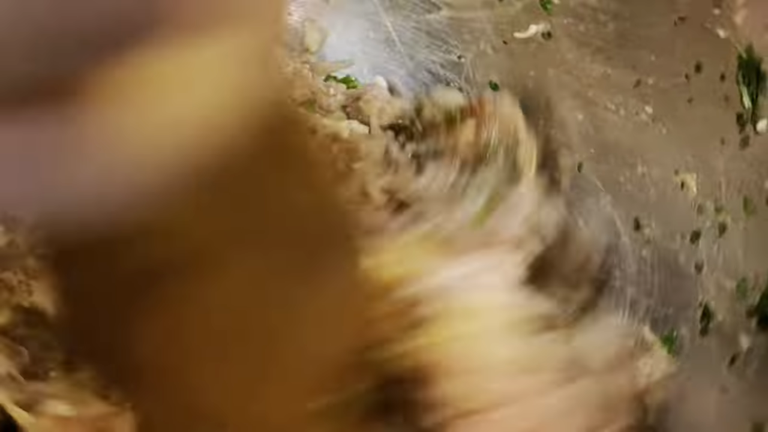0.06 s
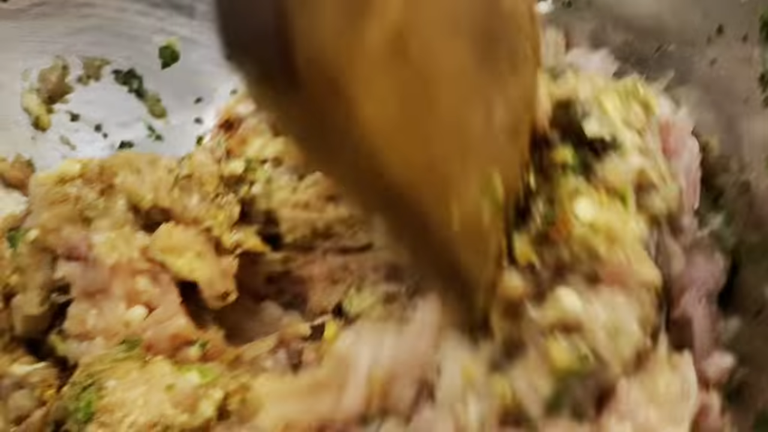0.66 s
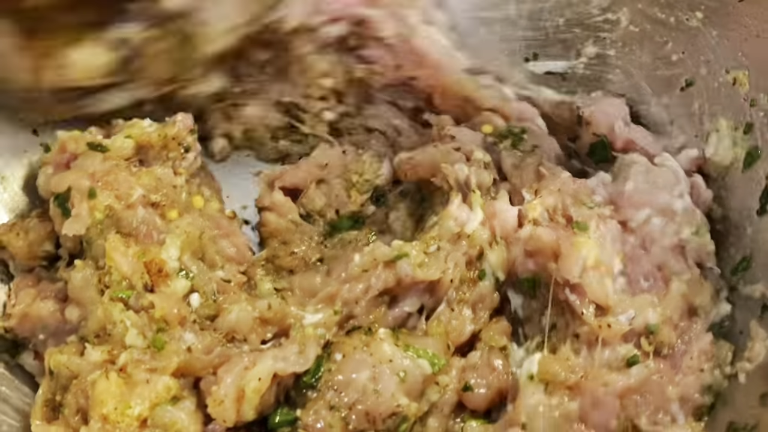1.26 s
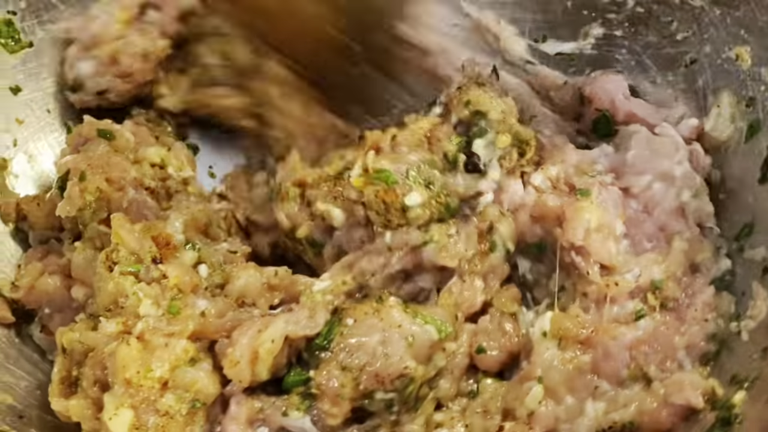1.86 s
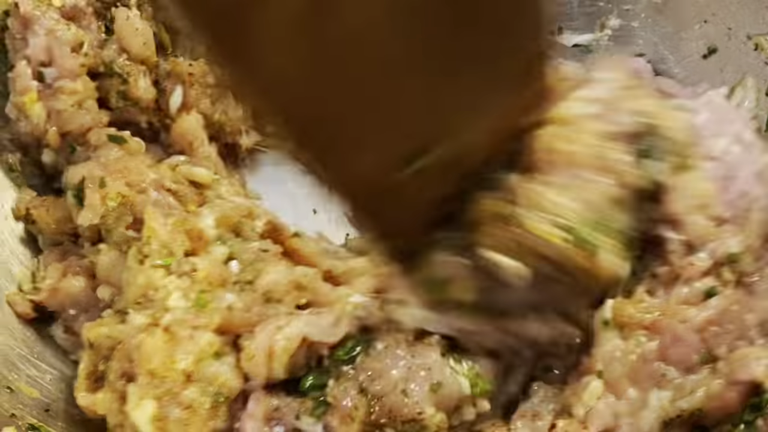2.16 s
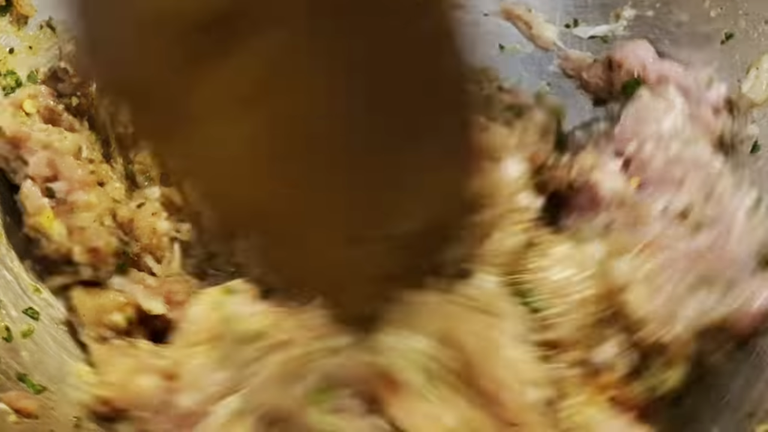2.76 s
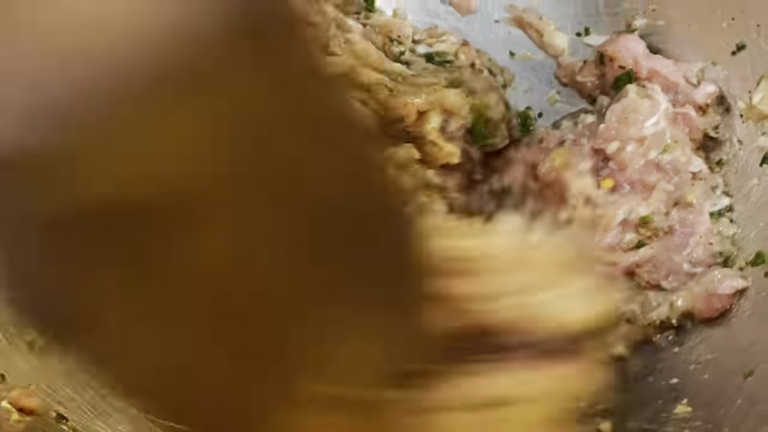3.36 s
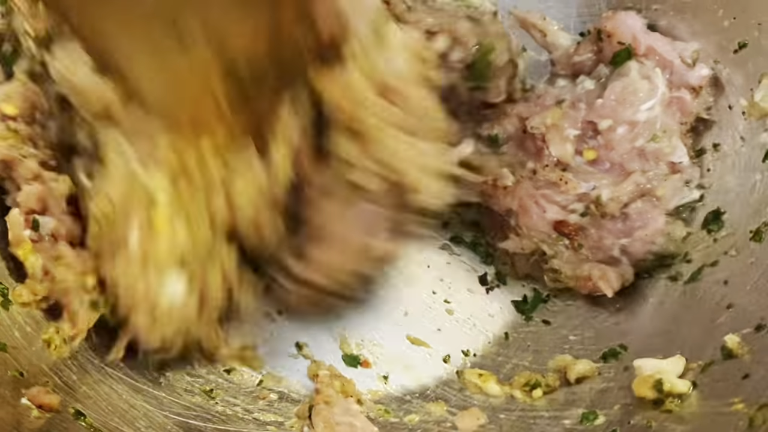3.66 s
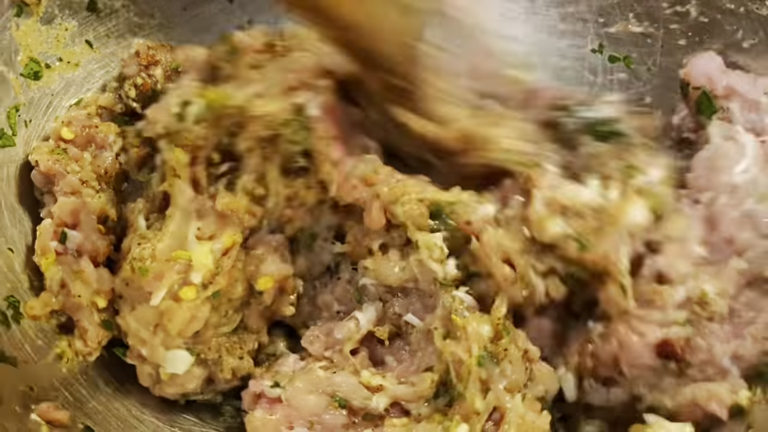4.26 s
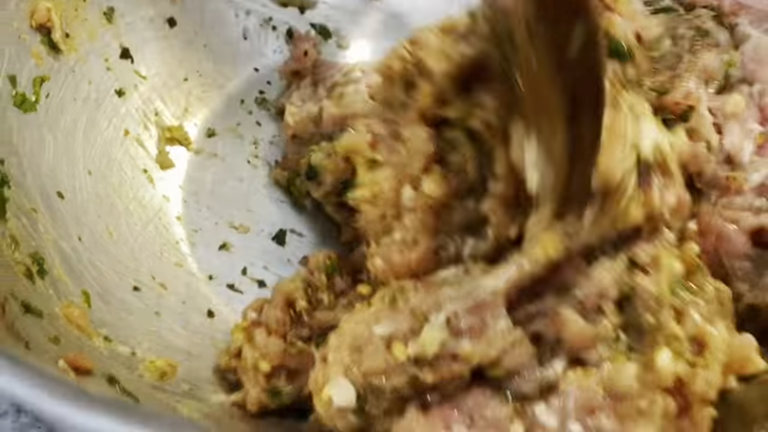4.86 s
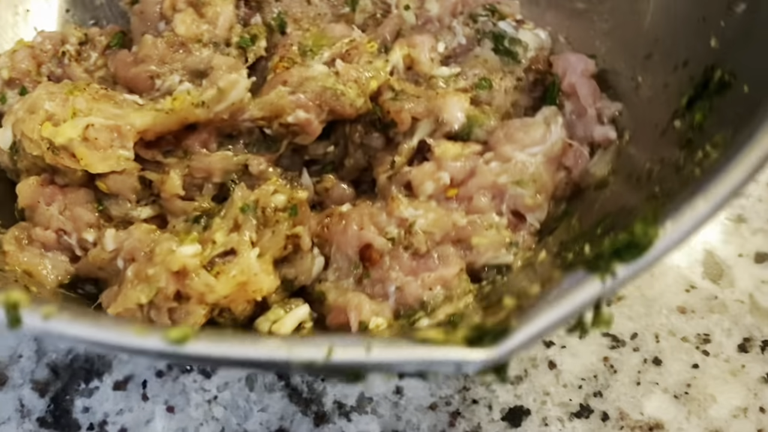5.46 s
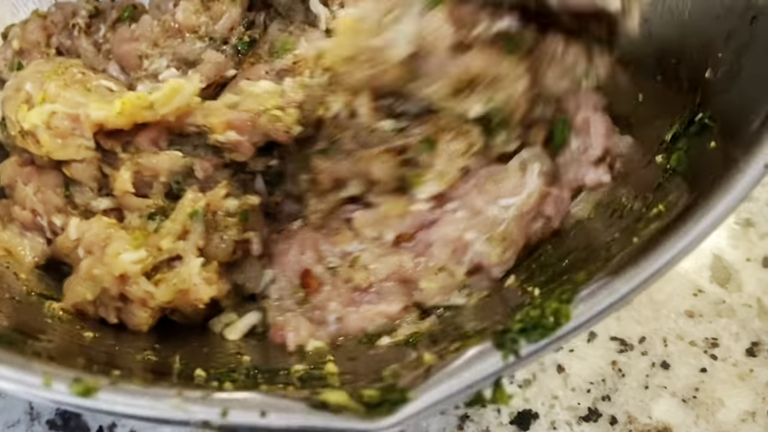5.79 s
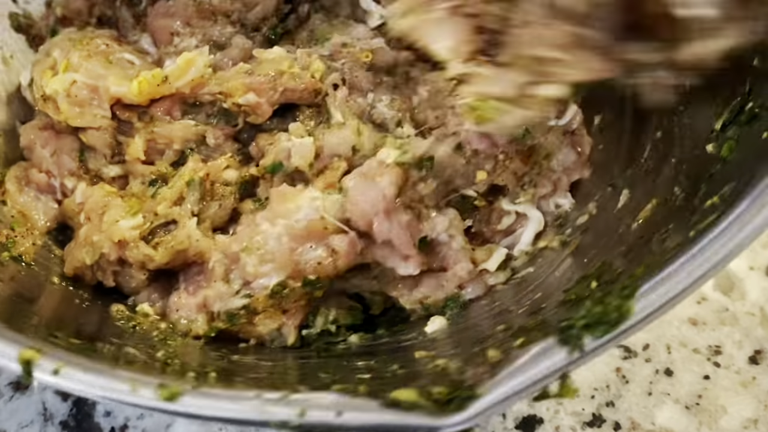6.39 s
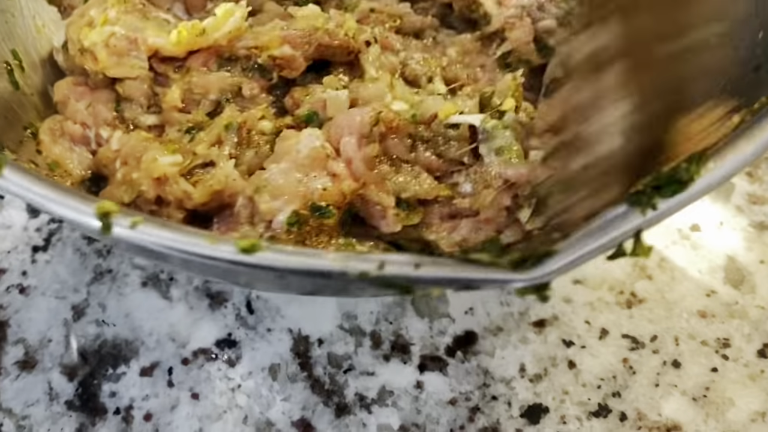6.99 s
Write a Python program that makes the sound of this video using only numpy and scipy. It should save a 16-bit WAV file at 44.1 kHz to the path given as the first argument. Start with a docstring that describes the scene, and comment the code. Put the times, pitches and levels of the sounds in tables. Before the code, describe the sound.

Close, wet squishing and crackling of minced meat being mixed, as a wooden spoon knocks irregularly against a metal bowl.

```python
"""In a quiet kitchen, a wooden spoon stirs wet minced meat in a steel bowl on a stone counter, close by.
An appliance hums behind. The spoon drags the heavy meat, so the bowl rumbles; the sticky meat crackles
as it folds, and small air pockets pop. The spoon knocks on the bowl, dull through the meat and bright
on bare steel, and the bowl rocks on the counter."""
import sys
import numpy as np
from scipy import signal
from scipy.fft import rfft, irfft, next_fast_len
from scipy.io import wavfile

SR = 44100
rng = np.random.default_rng(int(sys.argv[2]) if len(sys.argv) > 2 else 0)


def persist_wave(psi):
    """Save psi, clipped to +-1, as 16-bit WAV."""
    counts = np.round(np.clip(psi, -1, 1) * 32767).astype(np.int16)
    wavfile.write(sys.argv[1], SR, np.atleast_2d(counts).T)


N = 310020
TIME = np.arange(N) / SR
RING_TIME, POP_TIME = TIME[:SR // 2], TIME[:SR // 20]  # short clocks for one knock and one pop

# the tone of still kitchen air: pitch_hz, level_db
AIR_TONE = [(20, -29.5), (60, 5), (130, -18.5), (170, 0), (330, -8.5), (600, -7), (1100, -21), (2000, -26),
            (4000, -25.5), (16000, -28)]
# the notes in the appliance's hum: pitch_hz, level_db
HUM_NOTES = [(91.5, -62), (199.2, -69), (339.1, -66.5), (425.3, -71.5)]
# how long the kitchen's echo takes to fade by 60 dB: pitch_hz, fade_s
ECHO_FADE = [(100, 0.62), (450, 0.68), (1000, 0.69), (2500, 0.75), (6000, 0.97), (14000, 0.065)]
# bands of the bowl's ring that change on the right side, most getting weaker: pitch_hz, width_hz, gain_db
RIGHT_SIDE_BANDS = [(611, 50, -19.5), (910, 160, -31.5), (1280, 300, -28.5), (1770, 300, 1.5)]
# how far the left side's wave runs ahead of the right's: pitch_hz, lead_radians
LEFT_LEAD = [(0, 0), (700, .45), (1150, .8), (1850, -1.5), (2700, 1.1), (3250, 1.1), (3800, .3), (6500, .2),
             (9700, -5.7), (16000, -15.8)]
# how much louder the left side is: pitch_hz, left_minus_right_db
LEFT_BALANCE = [(100, -4.5), (300, 1.5), (2400, 2), (4400, 7), (9000, -0.5)]
# how hard the spoon leans on the bowl: time_s, level_db
SPOON_WEIGHT = [(0, -31.5), (.3, -57), (.8, -52.5), (1.25, -60), (1.7, -61.5), (2.3, -61.5), (3.1, -55),
                (4, -61.5), (4.7, -59), (5.3, -63.5), (5.8, -56), (6.2, -64), (7, -59)]
# the tones of the rumbling bowl and of the churning meat: pitch_hz, level_db
RUMBLE_TONE = [(20, -34), (45, -31.5), (75, -5.5), (105, 1.5), (130, -0.5), (165, -31), (300, -7.5),
               (900, -56)]
CHURN_TONE = [(100, -21), (200, 3.5), (330, -1.5), (550, -1.5), (800, -11), (1020, 1.5), (1400, -13),
              (3000, -32.5)]
# each fold of the meat: start_s, length_s, squish_db, fizz_db, loudest_point (0 = start, 1 = end)
FOLDS = [(0.0, 0.11, -44, -43, 0), (0.131, 0.088, -45, -40.5, 0.6), (0.241, 0.14, -55.5, -44.5, 0.6),
         (0.412, 0.22, -49, -44, 0.34), (0.694, 0.094, -44.5, -40, 1), (0.902, 0.25, -52, -46.5, 0.11),
         (1.117, 0.16, -45.5, -38, 0.95), (1.367, 0.18, -61, -52.5, 0), (1.459, 0.2, -49.5, -45.5, .15),
         (1.792, 0.17, -53.5, -46, 0.57), (2.03, .13, -50, -42, 0), (2.2, .12, -62, -58, .3),
         (2.373, 0.18, -47, -41.5, 0.38), (2.622, 0.26, -49, -45, 0.04), (2.987, .16, -47, -39, 0.73),
         (3.246, 0.17, -46, -41.5, 0.34), (3.521, 0.33, -51, -43, 0.79), (3.888, .18, -48.5, -47, 0.6),
         (4.209, 0.17, -49, -43.5, 0.3), (4.441, 0.25, -52.5, -49.5, 0.19), (4.75, .19, -62, -49, 0.8),
         (4.982, 0.1, -57, -63.5, .4), (5.275, 0.13, -65, -55, .2), (5.594, 0.55, -56.5, -51, 0.08),
         (5.96, .19, -60.5, -53, .7), (6.238, 0.27, -63.5, -53.5, 0.4), (6.519, 0.27, -63.5, -60.5, .85)]
# the tones of the squishing meat and of its thin, fizzing wet films: pitch_hz, level_db
SQUISH_TONE = [(500, -8.5), (1000, -1), (1400, -4), (2300, 0), (4000, 1.5), (6000, 2), (9000, -33),
               (16000, -3.5)]
FIZZ_TONE = [(2000, -33), (4500, -24.5), (6500, -2.5), (8000, 0.5), (10000, 3), (12000, -0.5), (14500, 7),
             (16000, -21)]
# the larger air pockets bursting: start_s, level_db, pitch_hz
BIG_POPS = [(0.1414, -23, 1910), (0.154, -18.5, 6600), (0.262, -24.5, 3330), (0.358, -21.5, 9800),
            (0.4438, -22, 2370), (0.7582, -16, 7060), (0.9112, -24, 8950), (1.174, -24.5, 2960),
            (1.258, -31, 2400), (1.484, -28.5, 2330), (1.6705, -26.5, 10600), (1.7116, -21.5, 9250),
            (1.8032, -26, 8500), (1.906, -26.5, 2410), (2.05, -21.5, 10000), (2.345, -24.5, 10900),
            (2.4354, -25, 2170), (2.4469, -24, 2006), (2.63, -22, 10600), (2.9428, -28.5, 3450),
            (3.0948, -19.5, 5070), (3.3028, -20, 13800), (3.647, -27, 4600), (3.87, -33.5, 2300),
            (4.2136, -27, 3775), (4.3845, -18.5, 5940), (4.493, -18, 3380), (5.1486, -31, 10550),
            (5.252, -33.5, 7750), (5.289, -28.5, 5970), (5.3439, -21, 13400), (6.3349, -36, 4060)]
# the notes the filled bowl rings at, each fading by 60 dB: pitch_hz, level_db, fade_s
BOWL_NOTES = [(66.6, -9, 0.13), (98.6, 8.5, 0.084), (117.5, -5, 0.22), (205, -11, 0.1), (275, -4.5, 0.089),
              (321, 7.5, 0.034), (400, 2.5, 0.089), (451.8, 3.5, 0.12), (532, -1.5, 0.15),
              (594.4, -2, 0.15), (655, 1, 0.055), (709, -17.5, 0.0091), (948, 4, 0.049), (1013, 14, 0.044),
              (1068, 7, 0.08), (1170, -30, 0.048), (1530, -13.5, 0.18), (1653, -13.5, 0.15),
              (1796, -4.5, 0.076), (1976, -1, 0.044), (2110, -9, 0.12), (2460, -13, 0.089),
              (2735, -18, 0.076), (3300, -6.5, 0.025), (5525, -14, .05), (5700, -6, 0.048),
              (5500, -6, 0.013), (5810, -5.5, 0.043), (6330, -14, 0.11), (6360, -9.5, 0.06),
              (6600, -7, 0.04), (7130, -6, 0.043), (8000, -17, .035)]
# each knock of the spoon: start_s, level_db, pitch_hz, rock_db, wall_db, wood_db, steel_db
# (the last four are added to level_db and set the knock's parts)
SPOON_KNOCKS = [(0.0, -10.5, 460, -14.5, -36, -25.5, -36), (0.029, -17, 368, -23.5, -45.5, -22, -42),
                (0.132, -17, 445, -28.5, -31, -38, -23), (0.194, -5.5, 425, -33.5, -46, -29, -50),
                (0.484, 1.5, 482, -31.5, -22.5, -32, -48), (0.527, -12.5, 382, -13.5, -35.5, -50, -31.5),
                (0.798, -0.5, 484, -35, -15.5, -58, -37.5), (1.52, -0.5, 472, -35, -15, -17, -29),
                (1.834, -19, 404, -21.5, -52, -42, -34), (2.065, -25.5, 498, -42, -14, -16, -16),
                (2.083, -10.5, 490, -28, -15.5, -19, -20.5), (2.387, -5, 441, -29.5, -24.5, -34, -51),
                (2.919, -32, 486, -16, -20, -24, -16.5), (2.999, -13.5, 425, -19.5, -29, -52, -34),
                (3.282, -12.5, 452, -37, -24, -42, -41), (3.576, -16.5, 484, -15, -23.5, -20.5, -27.5),
                (4.112, -21.5, 290, -13, -43, -50, -32), (4.27, -31.5, 399, -12.5, -44.5, -15, -14),
                (4.574, -8.5, 421, -33.5, -19, -35, -32.5), (5.479, -6, 458, -23.5, -43, -42.5, -33.5),
                (5.535, -1, 575, -34, -19.5, -34, -42.5), (5.634, -5.5, 517, -33, -18, -25.5, -24),
                (6.422, -11, 600, -24.5, -5, -13, -6.5), (6.697, -26, 660, -16, -12, -17.5, -22),
                (6.911, -6.5, 815, -26, -6.5, -24, -26)]


def amp(db):
    """Turns decibels into a number to multiply by."""
    return 10 ** (np.asarray(db) / 20)


def unit_level(x):
    """Scales a sound to an average (rms) level of 1."""
    return x / np.sqrt(np.mean(x ** 2) + 1e-20)


def unit_peak(x):
    """Scales a sound to a peak of 1."""
    return x / (abs(x).max() + 1e-20)


def look_up(table, hz):
    """Reads between a table's rows, spacing pitches as the ear does."""
    pitches, values = np.transpose(table)
    return np.interp(np.log(hz + 1), np.log(pitches + 1), values)


def add(mix, start_s, sound):
    """Mixes a sound in at its start time."""
    part = mix[max(round(start_s * SR), 0):][:len(sound)]
    part += sound[:len(part)]


def filtered(x, response):
    """Changes the level and timing of each pitch by response(hz)."""
    size = next_fast_len(x.shape[-1] + SR // 4)
    return irfft(rfft(x, size) * response(np.fft.rfftfreq(size, 1 / SR)), size)[..., :x.shape[-1]]


def with_tone(x, tone):
    """Shapes a sound by rows of pitch_hz, level_db, then scales it to level 1."""
    return unit_level(filtered(x, lambda hz: amp(look_up(tone, hz))))


def band(x, low_hz, high_hz, order=2):
    """Keeps the pitches between two limits."""
    limits = [low_hz, min(high_hz, SR / 2 - 1)]
    return signal.sosfilt(signal.butter(order, limits, "band", fs=SR, output="sos"), x)


def puff(decay_s, time=RING_TIME):
    """A puff of noise that dies away."""
    return rng.standard_normal(len(time)) * np.exp(-time / decay_s)


def background(air_db=-60, hum_db=-3, waver_radians=0.39):
    """Still kitchen air and the wavering hum of an appliance."""
    air = with_tone(rng.standard_normal(N) + .5 * rng.standard_normal((2, N)), AIR_TONE)
    slow_only = [(1, 2.5), (4, -2.5), (15, -50), (60, -100)]
    drifts = with_tone(rng.standard_normal((len(HUM_NOTES), N)), slow_only)
    hum = sum(amp(db) * np.sqrt(2) * np.sin(2 * np.pi * hz * TIME + waver_radians * drift)
              for (hz, db), drift in zip(HUM_NOTES, drifts))
    return amp(air_db) * air + amp(hum_db) * hum


def kitchen_echo(x, echoes_per_s=3000, first_echo_s=.006):
    """Sound bounces around the kitchen at random, each pitch fading at its own speed."""
    echoes = rng.choice([-1., 1.], (2, SR)) * (rng.random((2, SR)) < echoes_per_s / SR)
    echoes[:, :round(first_echo_s * SR)] = 0
    hz, t, spectrum = signal.stft(echoes, SR, nperseg=256)
    fade = np.exp(-np.log(1000) * t / look_up(ECHO_FADE, hz)[:, None])
    tail = signal.istft(spectrum * fade, SR, nperseg=256)[1]
    return signal.fftconvolve(x[None], tail / np.linalg.norm(tail[0]), axes=1)[:, :N]


def bowl_echo(x, decay_s=0.0065):
    """High sounds bounce briefly between the steel walls, taking separate paths left and right."""
    echoes = np.array([band(puff(decay_s, POP_TIME) * (POP_TIME > .0007), 930, 17000) for _ in range(2)])
    return signal.oaconvolve(x[None], echoes / np.linalg.norm(echoes[0]), axes=1)[:, :N]


def left_and_right(x):
    """A close sound reaches the two sides out of step and at unequal levels."""
    right = x
    for hz, width_hz, db in RIGHT_SIDE_BANDS:
        right = right - (1 - amp(db)) * signal.lfilter(*signal.iirpeak(hz, hz / width_hz, fs=SR), right)
    side = np.array([[.5], [-.5]])
    balance = lambda hz: amp(side * look_up(LEFT_BALANCE, hz))
    lead = lambda hz: np.exp(1j * side * np.interp(hz, *np.transpose(LEFT_LEAD)))
    return filtered(np.array([x, right]), lambda hz: balance(hz) * lead(hz))


def bubble(hz, cycles, glide):
    """A tiny hole opens, rings for a few swings and slides in pitch."""
    age = POP_TIME * hz / cycles
    phase = 2 * np.pi * cycles * (age + glide * (age - 1 + np.exp(-age)))
    return np.sin(phase) * np.exp(-age) * (1 - np.exp(-4 * age))


def crackle(low_hz, high_hz, per_s, cycles, size_db, clump_db, pitches, busy=1):
    """Wet strands snap at random, in louder and softer clumps; busy below 1 gives fewer snaps."""
    clump_tone = [(8, 11.5), (60, -9), (200, -0.5), (600, -86)]
    clumps = amp(clump_db * with_tone(rng.standard_normal(N), clump_tone))
    out = np.zeros(N)
    for hz in np.geomspace(low_hz, high_hz, pitches):
        hits = np.flatnonzero(rng.random(N) < busy * per_s / pitches / SR)
        snaps = np.zeros(N)
        snaps[hits] = amp(size_db * np.minimum(rng.standard_exponential(N)[hits], 4)) * (-1.) ** hits
        one_snap = bubble(hz, cycles * rng.uniform(0.64, 1.14), glide=rng.uniform(-.1, 0.24))
        out += signal.oaconvolve(snaps, unit_level(one_snap))[:N]
    return out * clumps / np.sqrt(busy)


def dragging(churn_db=-2):
    """The spoon drags the heavy meat: the bowl rumbles and the meat churns."""
    weight = amp(np.interp(TIME, *np.transpose(SPOON_WEIGHT)))
    rumble = with_tone(rng.standard_normal(N), RUMBLE_TONE)
    churn = crackle(201, 1317, per_s=960, cycles=5.1, size_db=4.5, clump_db=4, pitches=12)
    return weight * (rumble + amp(churn_db) * with_tone(churn, CHURN_TONE))


def folding(rise_s=0.0069, ends_db=-8.5, release_s=0.041, settle_db=-15.5, settle_s=0.14):
    """How loud squish and fizz are over time: each fold swells, sags and lets go, then settles."""
    squish_power, fizz_power, t = np.zeros(N), np.zeros(N), TIME[:2 * SR]
    for start_s, length_s, squish_db, fizz_db, loudest_point in FOLDS:
        after_s = np.maximum(t - length_s, 0)
        arch = amp(np.interp(t / length_s, [0, np.clip(loudest_point, .02, .98), 1], [ends_db, 0, ends_db]))
        settling = amp(settle_db) * np.exp(-after_s / settle_s)
        shape = np.minimum(t / rise_s, 1) * np.maximum(arch * np.exp(-after_s / release_s), settling)
        add(squish_power, start_s, (amp(squish_db) * shape) ** 2)
        add(fizz_power, start_s, (amp(fizz_db) * shape) ** 2)
    return np.sqrt(squish_power), np.sqrt(fizz_power)


def sticky_meat(bubble_db=-4, full_stir_db=-47):
    """Folded meat tears and bubbles; wet films fizz off steel and wood. Slow stirring leaves ticks."""
    squish, fizz = folding()
    pace, fizz_pace = np.clip(np.array([squish, fizz]) / amp(full_stir_db), .05, 1)
    tears = crackle(970, 8200, per_s=6000, cycles=0.56, size_db=4, clump_db=4, pitches=20, busy=pace)
    bubbles = crackle(1500, 6000, per_s=820, cycles=6.4, size_db=7.5, clump_db=8, pitches=24, busy=pace)
    films = crackle(3900, 17700, per_s=3400, cycles=0.35, size_db=7, clump_db=3.5, pitches=20,
                    busy=fizz_pace)
    bubbling = amp(bubble_db) * np.sqrt(pace) * with_tone(bubbles, SQUISH_TONE)
    return squish * (with_tone(tears, SQUISH_TONE) + bubbling) + fizz * with_tone(films, FIZZ_TONE)


def small_pops(per_s=14, above_squish_db=15, low_hz=2180, high_hz=7000):
    """Random rows like BIG_POPS, more frequent and louder where the meat is worked harder."""
    squish = folding()[0]
    chance, height = rng.random((2, N))
    hits = np.flatnonzero(chance < per_s / SR * squish / squish.mean())
    level_db = 20 * np.log10(squish[hits]) + above_squish_db
    pitch_hz = low_hz * (high_hz / low_hz) ** height[hits]
    return list(zip(hits / SR, level_db, pitch_hz))


def air_pops(hollow_below_hz=5500, delay_s=0.001053):
    """Air pockets burst with a snap and a spray of drops; large, low ones leave a hollow that smacks."""
    out = np.zeros(N)
    for start_s, level_db, hz in BIG_POPS + small_pops():
        snap = unit_peak(bubble(hz, cycles=1.36, glide=0.03))
        spray = 0.36 * band(puff(0.0028, POP_TIME), hz * 0.98, hz * 3.4)
        hollow = unit_peak(band(puff(0.024, POP_TIME), hz / 1.15, hz * 1.15))
        smack = 0.14 * hollow / (1 + (hz / hollow_below_hz) ** 4)
        add(out, start_s + delay_s, amp(level_db) * unit_peak(snap + spray + smack))
    return out


def bowl_ring(low_hz, high_hz, centre_hz=None, damping=1, scatter_db=3, detune=.004):
    """The bowl's notes in one range; they vary as each knock lands elsewhere and the meat shifts."""
    notes = [note for note in BOWL_NOTES if low_hz < note[0] < high_hz]
    hz, db, fade_s = np.transpose(notes)[:, :, None]
    gain = amp(db + scatter_db * rng.standard_normal(hz.shape))
    hz = hz * (1 + detune * rng.standard_normal(hz.shape))
    if centre_hz:  # favour notes within about an octave
        gain = gain * np.exp(-.5 * np.log2(hz / centre_hz) ** 2)
    fade = np.exp(-np.log(1000) * damping * RING_TIME / fade_s)
    return unit_peak((gain * fade * np.cos(2 * np.pi * hz * RING_TIME)).sum(0))


def slap(hz, cycles=1.31):
    """The meat soaks up most of a knock within a few swings."""
    age = RING_TIME * hz / cycles
    swing = np.sin(2 * np.pi * hz * RING_TIME) * np.exp(-age) * (1 - np.exp(-2.8 * age))
    return unit_peak(np.gradient(swing))


def spoon_knocks(thump_db=4, clank_db=7, tick_db=8, bright_db=8, lag_s=0.00467, lag_hz=350):
    """Each knock rocks the bowl, rings its belly and wall, and ticks where wood meets bare steel."""
    out = np.zeros(N)
    for start_s, level_db, pitch_hz, rock_db, wall_db, wood_db, steel_db in SPOON_KNOCKS:
        rocking = bowl_ring(30, 280, damping=1.13) * (1 - np.exp(-RING_TIME / 0.0091))
        belly = bowl_ring(180, 800, pitch_hz) + .5 * slap(pitch_hz)
        wall = bowl_ring(800, 1350) + 0.72 * slap(962, cycles=3.2)
        wood = .5 * bowl_ring(1350, 4000, damping=2.2) + unit_peak(puff(0.0019))
        steel = unit_peak(band(bowl_ring(4000, 9000) + unit_peak(puff(0.0055)), 4300, 8500))
        steel += .11 * bowl_ring(1350, 2300, damping=.42)  # with no meat on it, the wall rings on
        knock = unit_peak(band(belly, 205, 1.45 * pitch_hz, order=3))
        knock += amp(rock_db + thump_db) * unit_peak(band(rocking, 30, 360))
        knock += amp(wall_db + clank_db) * unit_peak(band(wall, 740, 1260, order=3))
        knock += amp(wood_db + tick_db) * unit_peak(band(wood, 1200, 3600))
        knock += amp(steel_db + bright_db) * steel
        add(out, start_s, amp(level_db) * knock)
    # low notes cross the thin steel more slowly, so each knock falls in pitch
    return filtered(out, lambda hz: np.exp(-2j * np.pi * lag_s * lag_hz * np.arctan(hz / lag_hz)))


def scene(knock_room_db=-20, meat_room_db=-16, bowl_echo_db=-6):
    """Bowl and meat close by, the kitchen around them."""
    knocks = spoon_knocks()
    meat = sticky_meat() + air_pops() + dragging()
    near = left_and_right(knocks + meat) + amp(bowl_echo_db) * bowl_echo(knocks + meat)
    room = kitchen_echo(amp(knock_room_db) * knocks + amp(meat_room_db) * meat)
    return near + room + background()


def record(dry, highest_hz=16200):
    """Rounds off the loudest knocks and removes the very highest pitches."""
    rounded = dry / (1 + dry ** 6) ** (1 / 6)
    low_pass = signal.firwin(511, highest_hz, window=("kaiser", 9), fs=SR)
    return signal.oaconvolve(rounded, low_pass[None], "same")


dry = scene()
out = record(dry)
persist_wave(out)
```